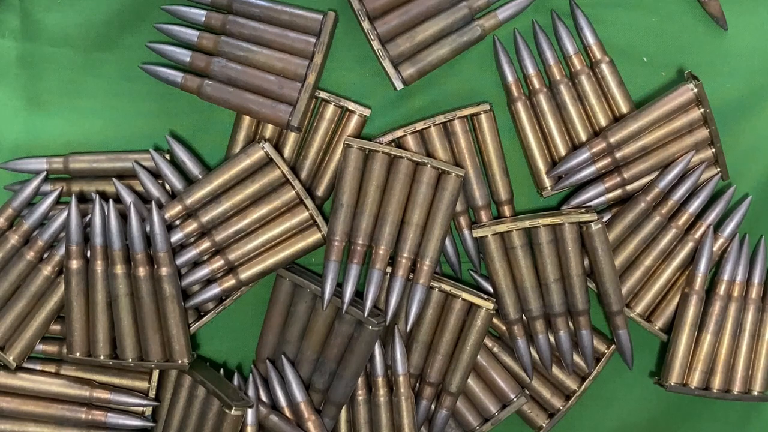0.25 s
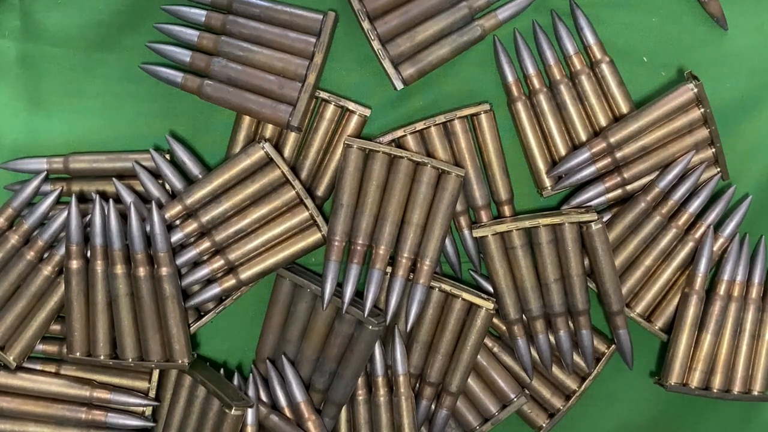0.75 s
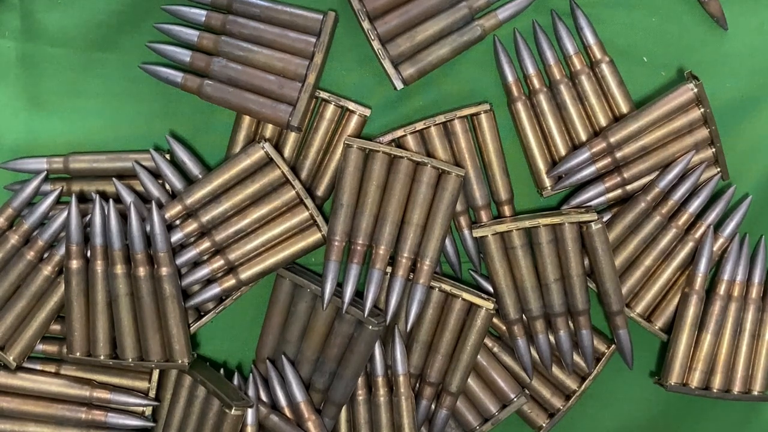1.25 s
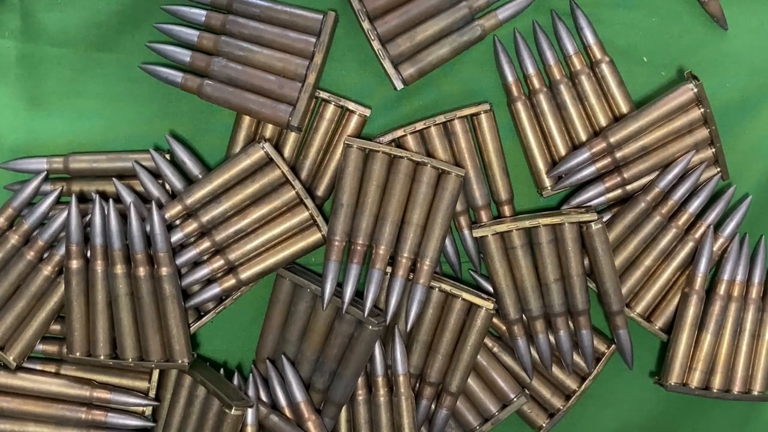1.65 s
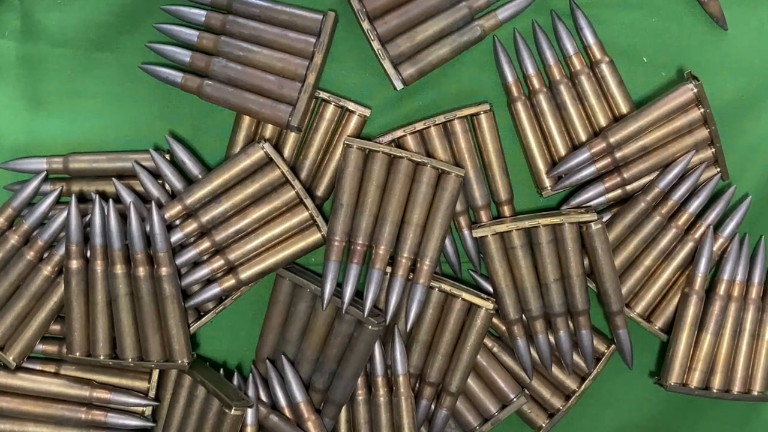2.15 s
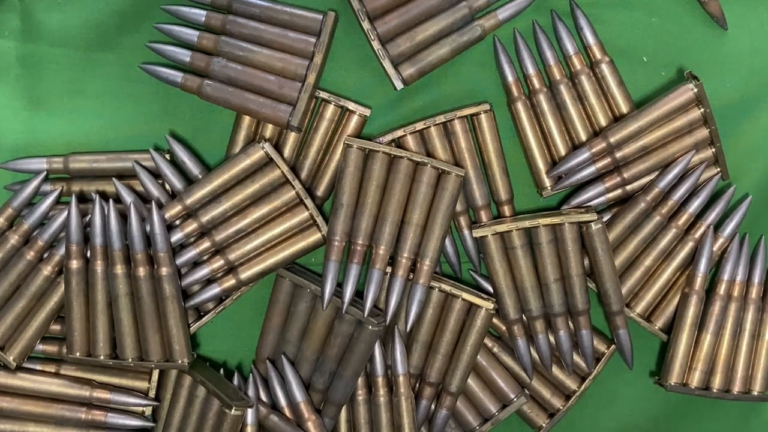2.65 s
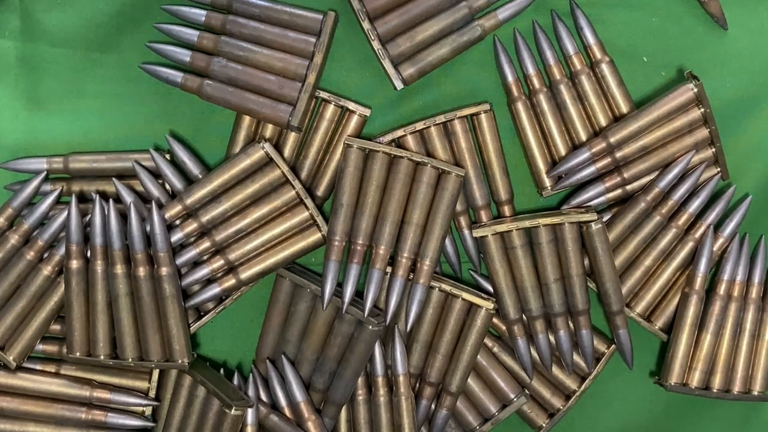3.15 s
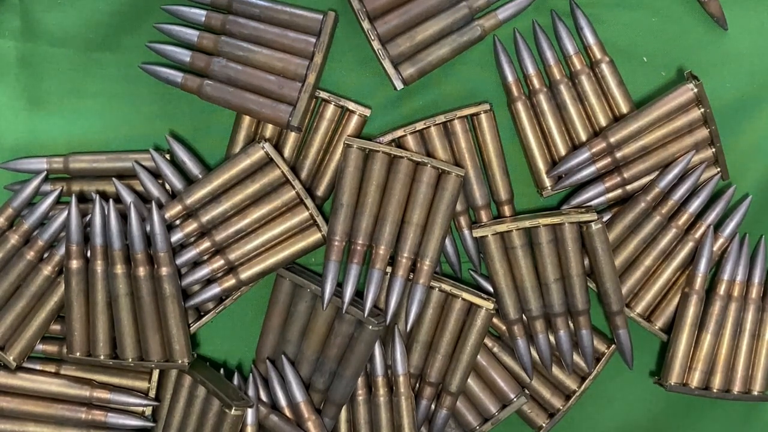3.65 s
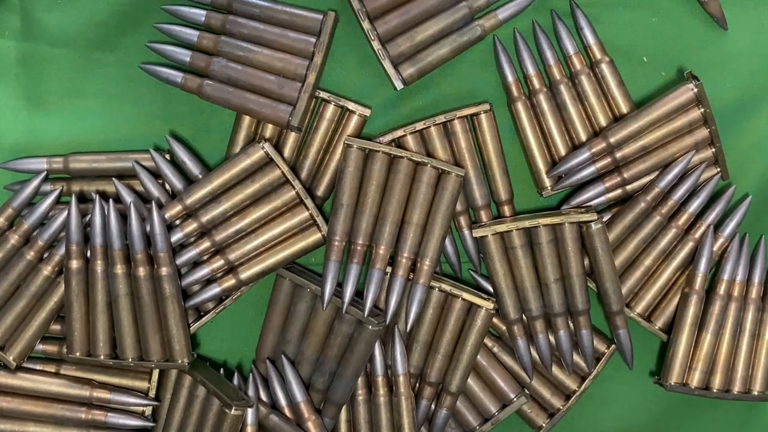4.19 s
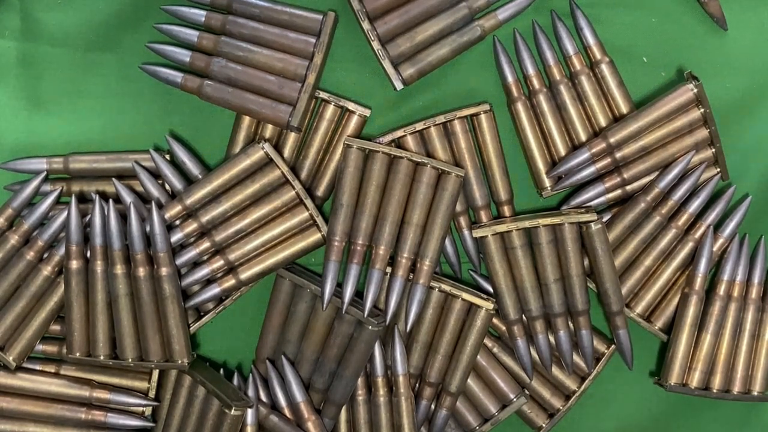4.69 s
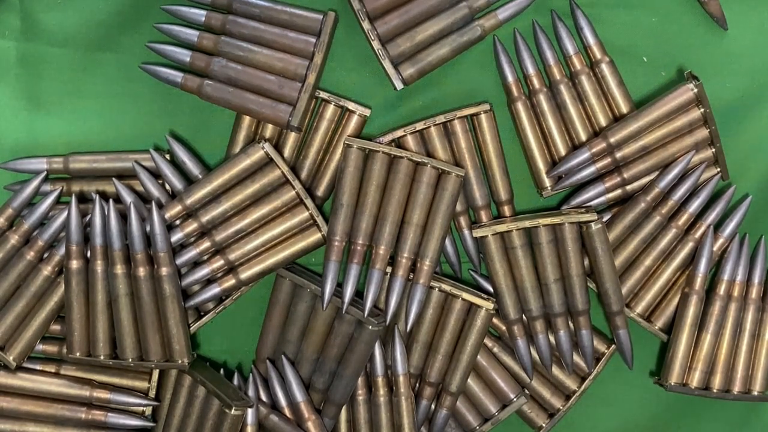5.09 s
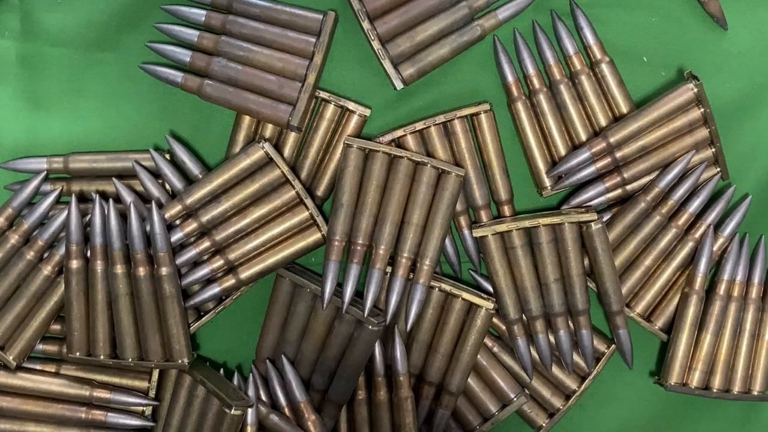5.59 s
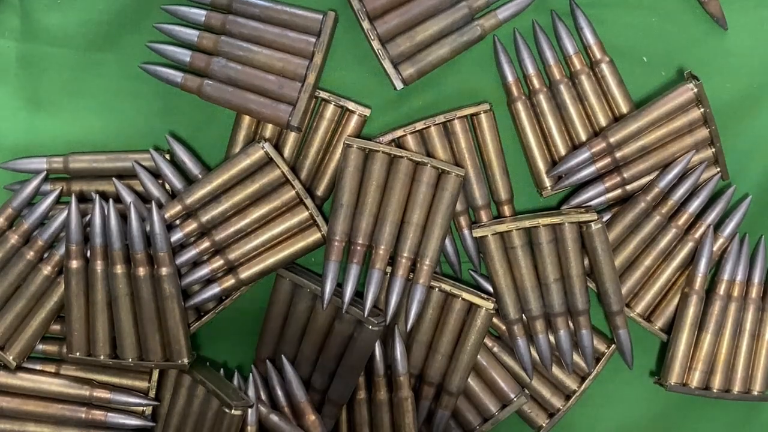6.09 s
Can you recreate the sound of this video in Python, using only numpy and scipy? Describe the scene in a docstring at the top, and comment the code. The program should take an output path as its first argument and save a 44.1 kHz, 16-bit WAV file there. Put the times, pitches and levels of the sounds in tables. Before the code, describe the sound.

Sparse light metallic taps build to sharp brass clinks and a loud clattering clash, then a dull knock and softer clinks above faint fan noise.

```python
"""A slowly beating fan hum with air noise opens the scene, under a faint slide of metal and a soft click.
Rifle cartridges on steel clips are then handled close to the stereo pair in a small room.
Each contact is a millisecond-scale burst of noise that rings brass cases and steel clips as decaying modes.
Something knocks on the table and settles: blunt bursts through table and room modes and a dull thud.
Shaped grains of noise slide between the clicks; decaying stereo noise gives the reflections."""
import sys
import numpy as np
from scipy import signal
from scipy.fft import rfft, irfft, next_fast_len
from scipy.io import wavfile
from scipy.ndimage import uniform_filter1d

SR = 44100
rng = np.random.default_rng(int(sys.argv[2]) if len(sys.argv) > 2 else 0)


def output_pcm(signal):
    """Save a mono or channel-first signal as 16-bit PCM at the path in sys.argv[1].

    Samples are clipped to [-1, 1] before scaling.
    """
    pcm = np.clip(np.atleast_2d(signal).T, -1, 1) * 32767
    wavfile.write(sys.argv[1], SR, np.round(pcm).astype(np.int16))


N = 279138
AGE = np.arange(SR // 2) / SR  # time since a contact [s]

# steadier fan tones: (frequency [Hz], RMS level around which it wavers [dB])
FAN_TONES = [(189, -60), (474, -80), (829, -81)]
# second motor hum, before the ear balance: (time [s], RMS level [dB])
SECOND_HUM = [(0, -57.5), (3.7, -56.5), (4.3, -72.5), (5, -78), (5.4, -60.5)]
# swells of the fan whine: (middle [s], full width at 1/e [s], peak RMS level added [dB])
WHINE_SWELLS = [(0.104, 0.07297, -60), (0.521, 0.1105, -63.5), (0.976, 0.2198, -61.5),
                (3.296, 0.06994, -57.5), (4.378, 0.04294, -53), (6.122, 0.261, -67.5)]
# spectrum of the fan's air noise: (frequency [Hz], relative level [dB])
AIR_COLOUR = [(25, -30), (40, -8.5), (75, -4.5), (108, -3), (155, -7), (215, 5), (290, -10), (450, -12.5),
              (800, -22), (1400, -28), (2500, -43.5), (4000, -45), (7000, -51), (12000, -51),
              (15000, -56.5)]
# left-right difference in the air noise: (frequency [Hz], level against the middle [dB])
AIR_SIDE = [(100, -8.5), (250, -13.0), (500, -1.5), (1000, 1.0)]
# room decay: (frequency [Hz], t60 [s])
ROOM_T60 = [(200, 0.65), (1000, 0.49), (3000, 0.45954), (5000, 0.40525), (9000, 0.34176), (12000, 0.33),
            (16000, 0.084)]
# colour of the metal's reflections: (frequency [Hz], relative level [dB])
METAL_ROOM_COLOUR = [(1000, -3.5), (1500, -3.5), (2600, -0.5), (4200, 5), (5200, 5), (6400, 1.5),
                     (9000, -4.5), (12000, -5.5), (16000, -5)]
# colour of the table's reflections: (frequency [Hz], relative level [dB])
TABLE_ROOM_COLOUR = [(200, -0.5), (1000, 2.5), (2500, -1), (4200, 4.5), (9000, 2), (16000, -6.5)]
# metal sliding on metal: (start [s], end [s], level before swell and unevenness [dB])
SLIDES = [(0, 0.241, -83), (1.814, 2.075, -70.5), (2.133, 2.338, -77), (3.868, 3.947, -65),
          (4.349, 4.406, -62), (4.501, 4.566, -50.5), (4.522, 4.545, -41.5), (5.401, 5.516, -72.5),
          (5.659, 6.097, -66), (6.103, 6.33, -70)]
# spectrum of sliding: (frequency [Hz], relative level [dB])
SCRAPE = [(1500, -10.5), (3500, -2), (5000, -13), (6500, -10), (8500, 5.5), (10000, -7.5), (11500, 10),
          (13200, -13.5), (15000, -3)]
# knocks on the table: (time [s], level before pan and softening [dB], top edge [Hz], right ear later [ms])
KNOCKS = [(5.1120, -11, 4462, -0.05774), (5.1181, -11.5, 1954, -0.0825), (5.130, -24, 2991, -0.0317),
          (5.147, -23.5, 2494, -0.04645), (5.180, -20.5, 1498, -0.0067), (5.2361, -14, 1510, -0.02523),
          (5.243, -21.5, 2506, -0.0166)]
# modes of the table and what lies on it, with one long room mode near 217 Hz:
#  (centre frequency [Hz], relative level [dB], t60 [s])
KNOCK_MODES = [(168.08, -24.5, 0.34), (216.8, -11.5, 1), (261.14, 5.5, 0.09248), (296.33, -9.5, 0.179),
               (529.74, -4, 0.04058), (605.06, -15.5, 0.236), (806.74, 8, 0.02372), (964.36, 1, 0.0351),
               (1260.3, -4, 0.0565), (1533, -6.5, 0.0549), (1861.8, -7, 0.02383), (2145, -1.5, 0.02523),
               (2394.4, -21.5, 0.029), (2765.4, -11.5, 0.02862), (3750.8, 1, 0.0477)]
# dull contact noise of a knock: (frequency [Hz], relative level [dB])
THUD = [(100, -0.5), (290, 6.5), (600, -4), (950, -3), (2500, 1), (3300, -11), (5000, -13), (9000, -12)]
# metal contacts: (time [s], touch, crack level [dB], brightness [dB per octave],
#  body knock against the crack [dB], body pitch [Hz], case sound against the crack [dB],
#  case reference pitch [Hz], reference t60 [s], chatter decay time [ms], right ear later [ms])
CLINKS = [(0.046, "tap", -38.5, -1, -3.5, 2225, -8.5, 4836, 0.02637, 1.5, 0.2641),
          (0.4862, "tap", -24.5, -1, 0.5, 1404, -10.5, 4898, 0.0202, 1.5, 0.40307),
          (0.734, "tick", -20.5, 9, -13, 1447, -15, 4876, 0.0263, 1, 0.3603),
          (0.795, "tick", -26.5, 6, -28.5, 1448, -24.5, 4903, 0.0285, .6, 0.2695),
          (1.0241, "clash", -20, -1, -12.5, 2203, -3.5, 4942, 0.1915, 1.5, 0.24265),
          (1.08, "clash", -28.5, -4, -3.5, 2260, -1.5, 5051, 0.053, 2, 0.3111),
          (1.093, "clash", -20.5, 6, -2, 2137, -10, 4897, 0.1359, 2, 0.2658),
          (1.1008, "clash", -29, .5, -4.5, 2246, -16.5, 4978, 0.0461, 2, 0.263),
          (1.7008, "tap", -29, 2.5, -3.5, 2195, -14, 6148, 0.03054, 1.5, 0.2617),
          (1.7199, "tap", -20.5, -3, 0, 1361, -12, 5111, 0.0613, 1.3, -0.03855),
          (1.903, "tick", -41, -3.5, -16, 1400, 1, 5456, 0.03453, 2, 0.2782),
          (2.041, "tick", -29, 1, -23, 1397, -15.5, 5490, 0.0282, 2, 0.2656),
          (2.05, "tap", -25.5, -3.5, -21, 1402, -4.5, 5418, 0.0478, 1.5, -0.0675),
          (2.607, "tick", -22, 1.5, -24.5, 1398, -16, 6183, 0.0502, 1.2, 0.2833),
          (3.0293, "clash", -7.5, 0.5, -9, 4247, -10, 5973, 0.01973, 1.8, 0.24066),
          (3.3366, "clink", -16, -1.5, -26, 4170, 4, 4974, 0.3058, 1.5, 0.2544),
          (3.4111, "clink", -3, 3.5, -27.5, 4164, -5.5, 4965, 0.12217, 2.8, .265),
          (3.4387, "tick", -5.5, 0.5, -25.5, 2230, -21, 5078, 0.107, .35, 0.3327),
          (3.4419, "clash", -18, 4.5, -20, 2277, -8, 4834, 0.1423, 1.5, 0.2973),
          (3.644, "tap", -33.5, -11.5, -10, 2300, -2, 6942, .02, 2, 0.2085),
          (3.928, "chink", -15.5, 4, -2, 2366, -6, 4972, 0.0434, 1.2, 0.26047),
          (3.947, "clash", -21.5, -5.5, -6, 2126, -7.5, 5169, 0.1208, 1.5, 0.2218),
          (4.215, "clack", -27.5, -6.5, -2.5, 3928, -4.5, 5700, .03, 1, -.09),
          (4.3276, "clash", -28.5, .5, -1.5, 2091, -13, 5010, .032, 1.5, 0.3753),
          (4.5281, "tick", -9, 4.5, -8, 3659, -19, 4900, 0.03076, 3.5, 0.026),
          (4.547, "clash", 5.5, 4, -26.5, 2790, -23, 5214, 0.0347, .8, 0.24303),
          (4.549, "clash", 2.5, -2, -13.5, 2881, -19, 5087, 0.0346, 1, 0.23804),
          (4.5509, "clash", -13, -2, -8.5, 2802, -13, 5000, 0.03465, 1, 0.2272),
          (4.562, "clash", -12.5, -2, -12, 2805, -14, 5030, 0.0341, 1.5, 0.19),
          (4.576, "chink", -12, 2.5, -21, 2817, -6.5, 4855, .035, 1.5, 0.3),
          (4.58, "chink", -2, -3, -22.5, 2800, -10.5, 4938, .042, 2, .255),
          (4.584, "chink", -8, 0.5, -21.5, 2825, -4, 4837, 0.032, 2, .265),
          (4.593, "clash", -21, -5, -10, 2798, -4.5, 5000, .04, 1.5, 0.29),
          (4.7834, "clack", -31, 7, -15, 2800, 9.5, 4971, 0.06745, 1, 0.2681),
          (4.796, "clack", -24, 4.5, -3.5, 3677, 1.5, 4982, 0.10117, 1, -0.17173),
          (4.822, "clink", -35, 3, -16, 2779, 4, 5020, 0.1004, 1, .25),
          (4.862, "tap", -36, -5, -1.5, 4161, -9.5, 5024, 0.1083, 1.5, 0.2168),
          (4.9683, "clack", -20, 4, -35, 2800, -1.5, 4902, 0.04827, 1, 0.2434),
          (5.0145, "clack", -19, 1, -33, 2800, -2.5, 5121, 0.02987, .8, 0.2424),
          (5.1153, "clack", -16.5, 0, -0.5, 2292, -10, 4593, 0.02025, .7, -0.12397),
          (5.658, "clack", -30.5, -2.5, 0, 3974, -1, 4870, .02, 4, 0.23367),
          (5.8699, "clack", -35, 0, 10, 4106, 1, 5015, 0.01368, 1, -0.0374),
          (5.9636, "chink", -11, -4, -4.5, 4263, -6.5, 4980, 0.03795, 1, -0.2143),
          (5.972, "chink", -10, 1.5, -13, 3930, -7, 5007, 0.0945, 1.3, .265),
          (6.076, "clack", -33.5, -4, 0, 4082, 5.5, 4878, 0.035, 1.5, 0.2738),
          (6.3011, "tap", -22, 0, -4.5, 4300, 14.5, 4843, 0.02188, 1, -0.15598)]
# ways in which the metal meets, by name:
#  tick: an edge slips off, thin and hard; tap: a loaded clip is set against another;
#  clash: clip strips strike each other; clink: case on case, bright and free to ring;
#  (clip strip [dB], case head [dB], case wall [dB], share of the wall t60 [ratio], top edge [Hz])
TOUCHES = {"tick": (-14, -3.5, -18, 0.5762, 14997.5), "tap": (-18, -18, -16.5, 0.0016, 13001),
           "clash": (-9.5, -10, -19, 1.4789, 14001.5), "clink": (-18, -17.5, 2.5, 1.372, 13499),
           "chink": (-15.5, -9, 4, 0.3231, 13003), "clack": (-10, -13.5, -6.5, 1, 10799.5)}
# spectrum of the hard contact itself: (frequency [Hz], relative level [dB])
CRACK = [(600, -48), (1600, -31.5), (2500, -16), (4000, -4.5), (5000, -3), (6000, -2), (7500, 0),
         (9100, 0.5), (10000, 3.5), (12200, 3), (13000, -10), (15000, 3.5), (16500, -8)]
STRIP = (2850, 2200)
STRIP_MODES = [(2705.9, -2, 0.065), (2870.2, 1, 0.075)]
# short bright modes of the case heads: (centre frequency [Hz], relative level [dB], t60 [s])
HEAD_MODES = [(7537.3, -10.5, .02), (8175.4, -8, 0.026), (8367, -8.5, .02), (9336.4, 3, 0.018),
              (9001.5, 0.5, 0.016), (8673.3, 2, 0.019), (9135, -11.5, .01)]
# bending modes of neighbouring cases, which beat against each other:
#  (multiple of the case reference pitch [ratio], relative level [dB], share of the reference t60 [ratio])
CASE_MODES = [(.962, -13, .5), (.981, -2, 1), (.987, -3, 1), (1.004, -3, .9), (1.019, -1, 1),
              (1.03, -6, .8), (1.07, -12, .5), (1.14, -7, .45), (1.165, -10, .4), (1.21, -13, .3),
              (1.48, -11, .25)]
# oval modes of the thin case wall:
#  (centre frequency [Hz], relative level [dB], t60 before the touch's share [s])
WALL_MODES = [(10900, -11, .02), (11130, -7, .035), (11390, -9, .07), (11505, 0, .04), (11515, -6, .2),
              (11850, -9, .04), (12020, -16, .06)]

# two motor hums, in step at one moment; level before the ear balance
MOTOR_HZ, SECOND_MOTOR_HZ, IN_STEP_S, MOTOR_DB = 59.16, 60.565, .45, -50
WHINE_HZ, WHINE_DB, WHINE_WAVER_DB = 616.35, -68.5, 3
AIR_DB = -52.5  # middle of the stereo image, before its slow waver
ROOM_DB, KNOCK_ROOM_DB = -6.5, -3  # gain of the metal's and the table's reflections
ROOM_GRAIN_DB = 2.5  # initial unevenness of the reflections, fading with time
SLIDE_UNEVEN_DB = 3
KNOCK_PAN_DB = -2.5  # left minus right, before the bass is centred
SCATTER_DB = -4.5  # against the direct contact
REBOUND_S, REBOUND_DB = .035, -21  # longest delay, and level against the first contact
STRIP_RING_DB = -14.5  # against the broad strip resonance
BODY_WIDTH = .42  # share of the body pitch
TOP_HZ = 16200
OPPOSITE = np.array([[1], [-1]])  # left and right in opposite sign


def undb(db):
    """Decibels to gain."""
    return 10 ** (np.asarray(db) / 20)


def unit(x):
    """Scale to an average energy of one per channel."""
    return x / np.sqrt(np.mean(np.sum(x ** 2, axis=-1)))


def fade(t60):
    """Exponential decay, 60 dB down after t60 seconds."""
    return np.exp(-np.log(1000) * AGE / max(t60, 1e-4))


def colour(x, points):
    """Causal minimum-phase filter with a (frequency [Hz], level [dB]) spectrum."""
    hz, db = np.transpose(points)
    n = 2 * next_fast_len(x.shape[-1])
    f = np.maximum(np.arange(n // 2 + 1) * SR / n, 1)
    gain = undb(np.interp(np.log(f), np.log(hz), db))
    # folding the cepstrum forward in time makes the response causal
    cepstrum = irfft(np.log(gain))
    cepstrum[1:n // 2] *= 2
    cepstrum[n // 2 + 1:] = 0
    return irfft(rfft(x, n) * np.exp(rfft(cepstrum)))[..., :x.shape[-1]]


def band(x, hz, width):
    """A broad resonance with steep skirts."""
    edges = [hz - width / 2, hz + width / 2]
    return signal.sosfilt(signal.butter(2, edges, "band", fs=SR, output="sos"), x)


def soften(x, hz, order):
    """A softer contact loses its top."""
    return signal.sosfilt(signal.butter(order, hz, fs=SR, output="sos"), x)


def ring(force, modes, spread):
    """Decaying modes driven by a force; no two blows meet quite the same tuning."""
    out = 0
    for hz, db, t60 in modes:
        tuned_hz = hz * (1 + spread * rng.standard_normal())
        tone = np.sin(2 * np.pi * tuned_hz * AGE) * fade(t60)
        motion = signal.fftconvolve(force, tone[None], axes=-1)[:, :len(AGE)]
        # a small body radiates its velocity, so little is heard below the mode
        sound = np.diff(motion, prepend=0)
        out = out + undb(db) * np.sqrt(t60) * unit(sound)
    # level is set by the energy of the first 6 ms
    attack = out[:, AGE < .006]
    return out / np.sqrt(np.sum(attack ** 2) / 2)


def add(out, s, x):
    """Mix a sound in at time s."""
    i = int(s * SR)
    out[:, i:i + x.shape[1]] += x[:, :N - i]


def walk(rate):
    """Slow random drift with a spread of one, stepping about `rate` times a second."""
    k = int(SR / rate)
    steps = np.repeat(rng.standard_normal(N // k + 1), k)[:N]
    slow = uniform_filter1d(uniform_filter1d(steps, k), k)
    return slow / slow.std()


def motor(t, hz):
    """A motor hums as a sine, its phase leading in the left ear."""
    return np.sin(2 * np.pi * hz * (t - IN_STEP_S) + np.array([[.55], [0]]))


def fan():
    """Two beating motor hums, a wavering whine and tones, and air noise with its bass more central."""
    t = np.arange(N) / SR
    second_db = np.interp(t, *np.transpose(SECOND_HUM))
    hum = undb(MOTOR_DB) * motor(t, MOTOR_HZ) + undb(second_db) * motor(t, SECOND_MOTOR_HZ)
    hum = hum * undb([[1.9], [-2.4]])  # ear balance
    swells = sum(undb(db) * np.exp(-(2 * (t - s) / length) ** 2) for s, length, db in WHINE_SWELLS)
    whine_gain = undb(WHINE_DB + WHINE_WAVER_DB * walk(16)) + swells
    phase_drift = 1.4 * np.array([walk(16), walk(13)])  # separate in each ear
    whine = whine_gain * np.sin(2 * np.pi * WHINE_HZ * t + phase_drift)
    tones = 0
    for hz, db in FAN_TONES:
        gain = undb(db + 1.9 * walk(6.5))
        tones = tones + gain * np.sin(2 * np.pi * hz * t + walk(6.4))
    mid, side = colour(rng.standard_normal((2, N)), AIR_COLOUR)
    side = colour(side, AIR_SIDE)
    air = (mid + side * OPPOSITE) / mid.std()
    # the root of two turns sine peak levels into RMS levels
    return np.sqrt(2) * (hum + whine + tones) + air * undb(AIR_DB + 1.1 * walk(1.5))


def room(x, tint):
    """Diffuse reflections build up in a few milliseconds; the treble dies first."""
    hz, t60 = np.transpose(ROOM_T60)
    shape = (2, len(AGE))
    noise = rng.standard_normal(shape)
    grain_db = ROOM_GRAIN_DB * fade(0.45) * rng.standard_normal(shape)
    spectrum = rfft(noise * undb(grain_db))
    f = np.arange(spectrum.shape[1]) * SR / len(AGE)
    edges = np.r_[0, np.geomspace(300, SR / 2, 14)]
    tail = 0
    for lo, hi in zip(edges, edges[1:]):
        one_band = irfft(spectrum * ((f >= lo) & (f < hi)), len(AGE))
        tail = tail + one_band * fade(np.interp((lo + hi) / 2, hz, t60))
    build_up = 1 - np.exp(-AGE / 0.0012)
    tail = colour(tail * build_up, tint)
    return signal.fftconvolve(x, unit(tail), axes=-1)[:, :N]


def slides():
    """Tiny catches of metal on metal swell and die with each uneven push."""
    out = np.zeros((2, N))
    for start, end, db in SLIDES:
        n = int((end - start) * SR)
        # wide random level jumps, shared by both ears, make the noise grainy
        catches = rng.standard_normal((2, n)) * undb(13.0 * rng.standard_normal(n))
        grains = colour(catches, SCRAPE)
        push = np.sqrt(np.hanning(n))
        add(out, start, undb(db) * push * grains / grains.std())
    return out * undb(SLIDE_UNEVEN_DB * walk(19))


def even(x):
    """A hard impact feeds all broad bands alike; only its fine ripple is chance."""
    power = uniform_filter1d(np.abs(rfft(x)) ** 2, size=len(x) // 32)
    hz = np.linspace(1, SR / 2, len(power))
    return colour(x, np.c_[hz, -10 * np.log10(power)])


def contact(chatter_ms, lag_ms):
    """A dying burst of micro-impacts reaches one ear first; the pile scatters it differently to each."""
    age = AGE[:1024]
    shape = (3, len(age))  # one direct burst and two ears of scatter
    hits = rng.standard_normal(shape) * undb(2.0 * rng.standard_normal(shape))
    burst = even(hits[0] * np.exp(-1000 * age / chatter_ms))
    # a positive lag delays the right ear, a negative one the left
    delays = np.maximum([[-lag_ms], [lag_ms]], 0) / 1000
    hz = np.arange(len(age) + 1) * SR / (2 * len(age))
    shifted = rfft(burst, 2 * len(age)) * np.exp(-2j * np.pi * hz * delays)
    direct = irfft(shifted)[:, :len(age)]
    scatter = unit(hits[1:] * age * np.exp(-age / 0.0013))
    force = unit(direct) + undb(SCATTER_DB) * scatter
    return np.pad(force, [(0, 0), (0, len(AGE) - len(age))])


def knocks():
    """A blunt blow thuds and rings the table and one room mode; its softness trims the top."""
    out = np.zeros((2, N))
    pan = undb(KNOCK_PAN_DB / 2 * OPPOSITE)
    for s, db, top_hz, lag_ms in KNOCKS:
        force = contact(2.189, lag_ms)
        body = ring(force, KNOCK_MODES, spread=0.010577) + unit(colour(force, THUD))
        add(out, s, undb(db) * pan * soften(body, top_hz, order=1))
    # long waves reach both ears alike
    low_side = soften((out[0] - out[1]) / 2, 460, order=1)
    return out - low_side * OPPOSITE


def rebound(force):
    """The metal falls back once, a little later and much more lightly."""
    late = int(SR * REBOUND_S * rng.uniform(.2, 1))
    return force + undb(REBOUND_DB) * np.roll(force, late, axis=-1)


def crack(force, brightness, strip_db, head_db, top_hz):
    """The hard contact excites the damped clip strip and the stiff case heads."""
    strip = unit(band(force, *STRIP))
    strip = strip + undb(STRIP_RING_DB) * ring(force, STRIP_MODES, spread=0.011)
    hard = unit(colour(force, CRACK)) + undb(strip_db) * strip
    hard = hard + undb(head_db) * ring(force, HEAD_MODES, spread=0.01)
    tilt = [(1000, 0), (16000, 4 * brightness)]  # four octaves
    return unit(soften(colour(hard, tilt), top_hz, order=4))


def case_bending(force, case_hz, t60):
    """A loose case sings; one pinched by its neighbours only clacks around its pitch."""
    loose = np.clip(t60 / .2, .05, .7)
    modes = [(k * case_hz, db, share * t60) for k, db, share in CASE_MODES]
    sing = np.sqrt(loose) * ring(force, modes, spread=0.0022)
    clack = np.sqrt(1 - loose) * unit(band(force, 1.0328 * case_hz, 1300 * (1 - loose)))
    return sing + undb(-7) * clack


def case_wall(force, wall_share):
    """The thin case wall rings in oval modes, held more or less by the touch."""
    modes = [(hz, db, wall_share * t60) for hz, db, t60 in WALL_MODES]
    return ring(force, modes, spread=0.0013)


def clinks():
    """Each contact cracks, knocks the loaded clip and rings the cases; the touch sets the mix."""
    out = np.zeros((2, N))
    for (s, touch, db, brightness, body_db, body_hz,
         case_db, case_hz, t60, chatter_ms, lag_ms) in CLINKS:
        strip_db, head_db, wall_db, wall_share, top_hz = TOUCHES[touch]
        force = rebound(contact(chatter_ms, lag_ms))
        mix = crack(force, brightness, strip_db, head_db, top_hz)
        mix = mix + undb(body_db) * unit(band(force, body_hz, BODY_WIDTH * body_hz))
        mix = mix + undb(case_db) * case_bending(force, case_hz, t60)
        mix = mix + undb(wall_db) * case_wall(force, wall_share)
        add(out, s, undb(db) * mix)
    return out


def scene():
    """Metal and table close by, their reflections, and the fan."""
    metal = clinks() + slides()
    table = knocks()
    metal_room = undb(ROOM_DB) * room(metal, METAL_ROOM_COLOUR)
    table_room = undb(KNOCK_ROOM_DB) * room(table, TABLE_ROOM_COLOUR)
    return metal + table + metal_room + table_room + fan()


def record(dry):
    """The recorder cuts the top with a steep low-pass."""
    return signal.sosfilt(signal.ellip(8, .2, 80, TOP_HZ, fs=SR, output="sos"), dry)


dry = scene()
out = record(dry)
output_pcm(out)
```